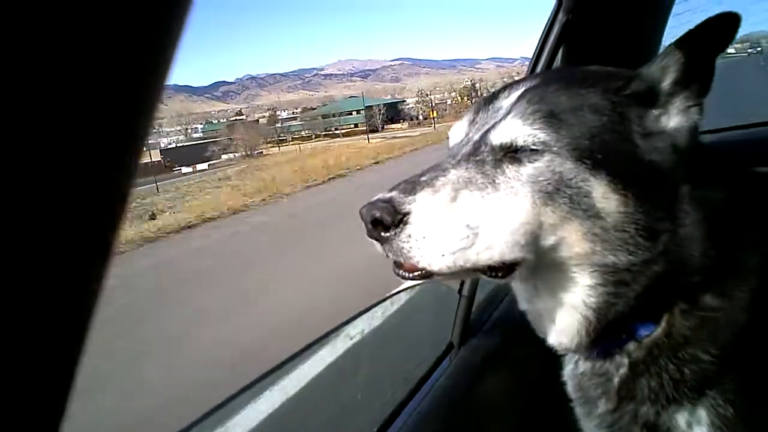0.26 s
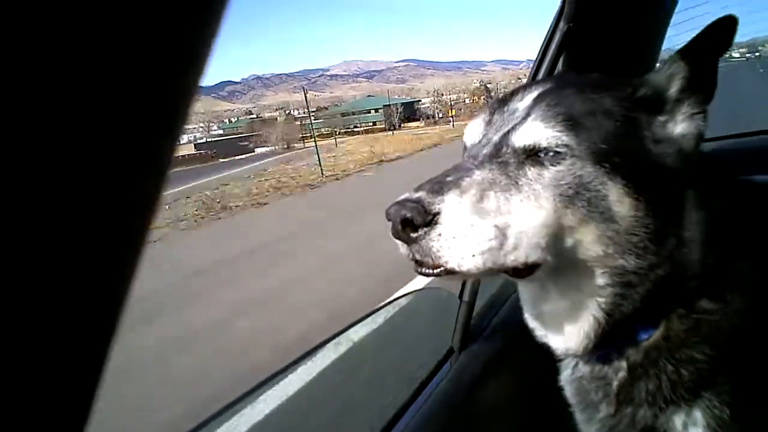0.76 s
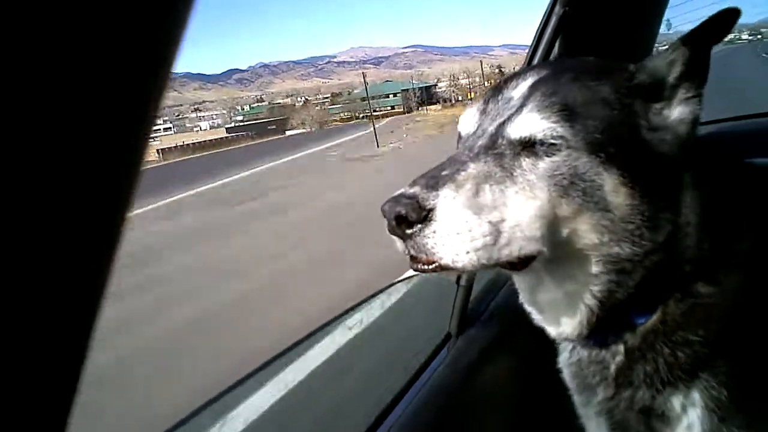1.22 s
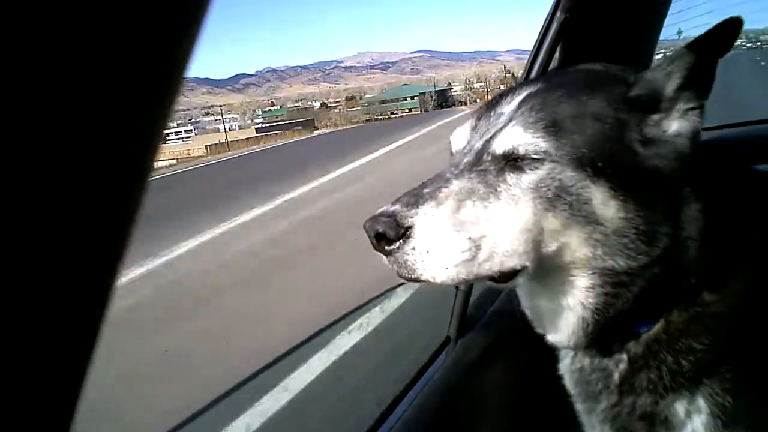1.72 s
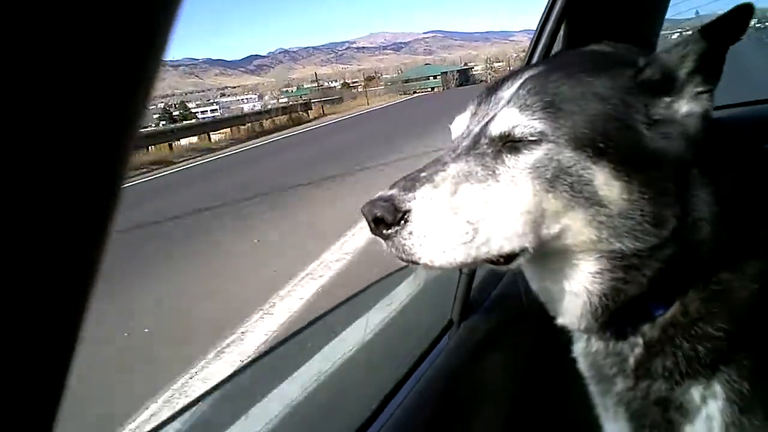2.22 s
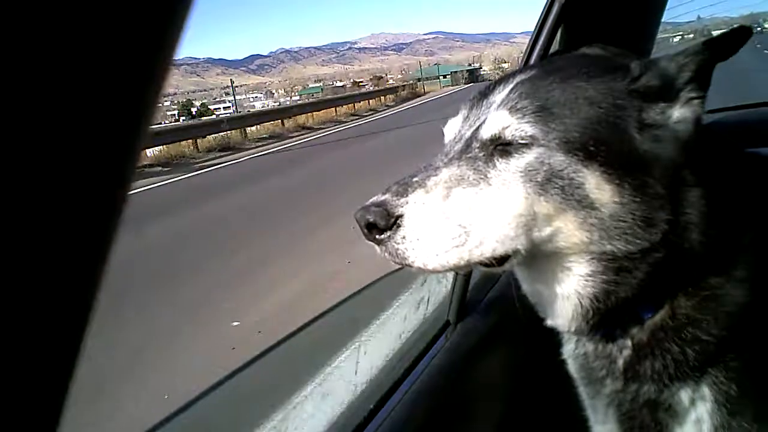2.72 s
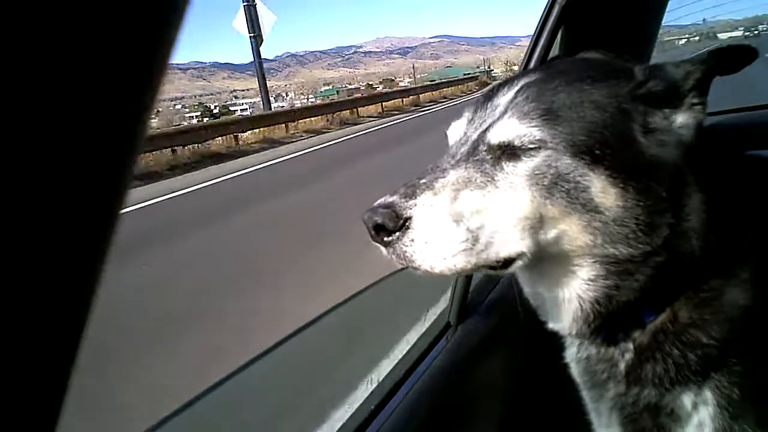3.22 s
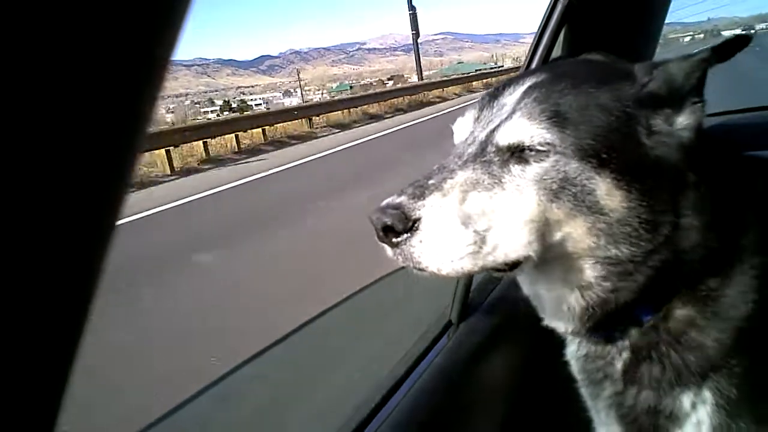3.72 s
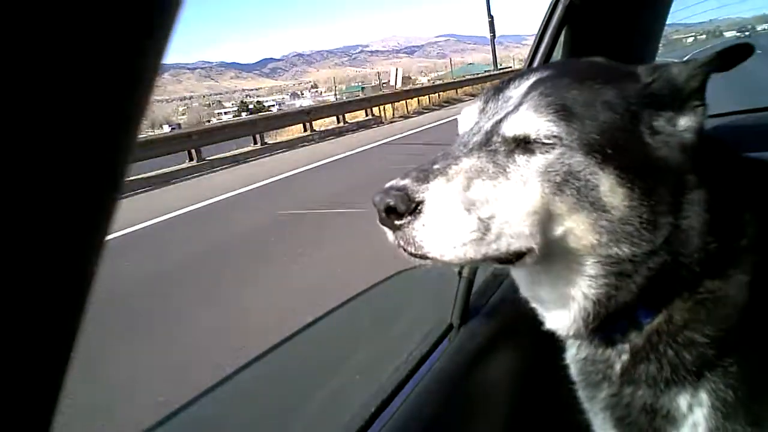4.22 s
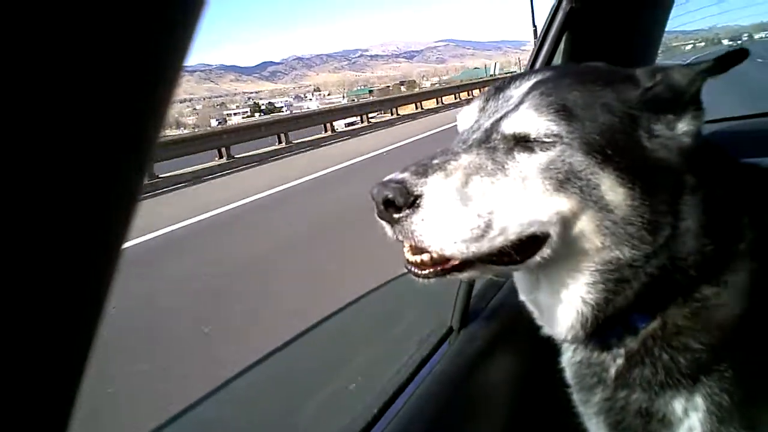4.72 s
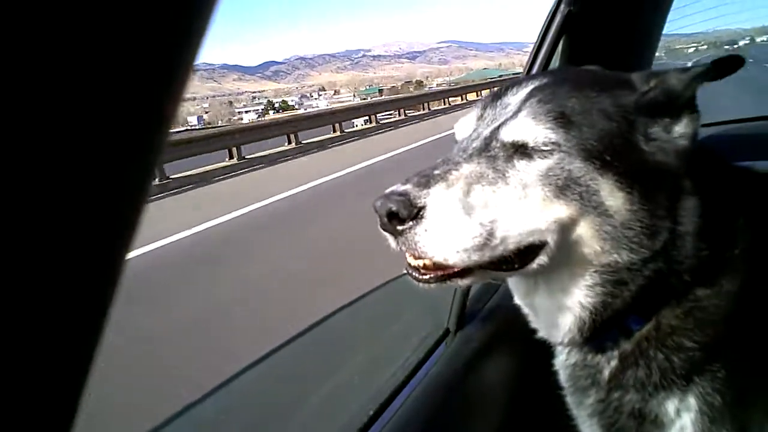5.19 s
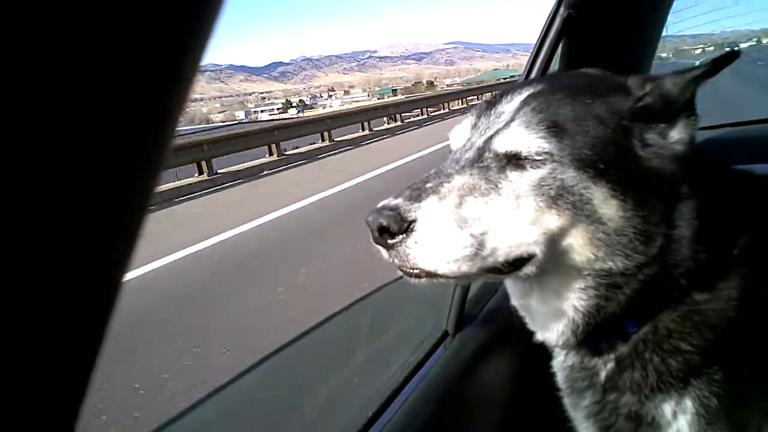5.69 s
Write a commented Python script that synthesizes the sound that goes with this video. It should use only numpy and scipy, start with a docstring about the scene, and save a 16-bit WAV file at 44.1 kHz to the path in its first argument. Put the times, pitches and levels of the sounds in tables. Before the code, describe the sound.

Inside a car at highway speed, close to an open side window, one small microphone catches continuous wind and road noise. A steady, muffled tyre and asphalt drone with boxy cabin resonance lies beneath. Over it the slipstream rushes in uneven lumps, with low buffeting, a rougher mid-range tearing at the window edge and sputtering hiss. Wind is fullest and hissiest in the first second, with a hard thump at about 0.8 s and a softer one at 1.3. It weakens from 1.5 s, broken by brief gusts around 1.7 to 2.2. A strong short gust and thump come near 3.0 s, then a thinner stretch with a lull at 3.8 and tiny ticks between 3.2 and 4.0. Gusts crowd together from 4.3 to 4.9, with low bumps around 4.8, then ease and swell slightly towards the end. Millisecond dropouts roughen it near 2.1, 2.9, 3.7, 4.7 and 5.4. The dog makes no sound.

```python
"""Open car window at highway speed

Inside the car beside an open side window, close to one small microphone: noise shaped by spectra gives
a steady road drone and a slipstream that rushes, flutters and hisses at the frame, with gusts and lulls.
Eddies thump on the microphone as short pressure swings; sharp single spikes with a faint, quickly fading
noisy tail make a few tiny ticks. At set moments the microphone chokes for a few milliseconds."""
import sys
import numpy as np
from scipy import signal
from scipy.fft import rfft, irfft, next_fast_len
from scipy.io import wavfile
from scipy.ndimage import uniform_filter1d, map_coordinates

SR = 44100
rng = np.random.default_rng(int(sys.argv[2]) if len(sys.argv) > 2 else 0)


def master_out(mix):
    """Clip the mix to full scale and print it as 16-bit PCM to the path in sys.argv[1]."""
    frames = np.transpose(np.atleast_2d(mix))
    ceiling = np.clip(frames, -1, 1)
    pcm = np.round(ceiling * 32767).astype(np.int16)
    wavfile.write(sys.argv[1], SR, pcm)


N = 262395

# broad resonances of the cabin air: (centre [Hz], width [Hz], height [dB])
CABIN_RESONANCES = [(196, 40, 3), (265.6, 32, 4), (356, 33, 3), (873, 155, 2)]
# spectrum of the hiss at the window, with or without the port's colour: (frequency [Hz], relative level [dB])
HISS_SPECTRUM = [(700, -20), (1800, -5), (2700, 2.5), (3500, 1), (5000, -5), (7000, -9), (9500, -15.5),
                 (11500, -25), (13000, -28.5), (15500, -30)]


def amp(db):
    """Decibels to gain."""
    return 10 ** (np.asarray(db) / 20)


def unit(x):
    """Scale to rms 1."""
    return x / np.sqrt(np.mean(x ** 2) + 1e-20)


def wobble(rate):
    """A smooth random curve, rate knots a second."""
    knots = rng.standard_normal(int(N * rate / SR) + 4)
    return map_coordinates(knots, [np.arange(N) * rate / SR])


def filtered(x, response):
    """x times a response of frequency, padded so that its end does not wrap round to the start."""
    m = next_fast_len(N + SR // 2)
    return irfft(rfft(x, m) * response(np.fft.rfftfreq(m, 1 / SR)), m)[:N]


def coloured(x, spectrum, bumps=()):
    """x through a smooth spectrum with bell-shaped peaks and dips, at rms 1."""
    f, level = np.transpose(spectrum)

    def response(hz):
        db = np.interp(np.log(hz + 1), np.log(f), level)
        for centre, width, height in bumps:
            db = db + height / (1 + (2 * (hz - centre) / width) ** 2)
        return amp(db)

    return unit(filtered(x, response))


def turbulence(patchy_db):
    """White noise whose strength drifts in patches of time and frequency, patchy_db rms."""
    z = signal.stft(rng.standard_normal(N), nperseg=512)[2]
    field = uniform_filter1d(rng.standard_normal(z.shape), size=9, axis=0)
    field = uniform_filter1d(field, size=10, axis=1)
    return signal.istft(z * amp(patchy_db * unit(field)), nperseg=512)[1][:N]


def road():
    """Steady cabin boom and the roar of tread on asphalt, coloured by the cabin air."""
    # spectrum of tyres and road heard inside: (frequency [Hz], relative level [dB])
    road_spectrum = [(20, -37), (50, -21), (90, -12.5), (200, -3.5), (280, -1.5), (450, -4), (680, -8.5),
                     (860, -6.5), (1250, -16.5), (1700, -11), (2600, -30), (6000, -39), (15000, -51.5)]
    return amp(-49) * coloured(turbulence(patchy_db=-1.0), road_spectrum, CABIN_RESONANCES)


def slipstream():
    """One wind strength drives the layers; the shear layer flaps in the opening, so they flutter together."""
    # steady strength of the stream between gusts: (time [s], level [dB])
    stream_levels = [(0.0, -39), (0.69, -41.5), (1.05, -41), (1.11, -44.5), (1.29, -43), (1.56, -47),
                     (1.79, -42), (2.51, -48.5), (2.8, -45), (3.36, -50.5), (4.22, -49), (4.98, -46.2),
                     (5.61, -47.5), (5.95, -43.5)]
    times, levels = np.transpose(stream_levels)
    stream_db = np.interp(np.arange(N) / SR, times, levels)
    mean_db = stream_db.mean()
    swell_db = stream_db - mean_db
    rise_db, bright_db = gusts()
    wind_db = swell_db + rise_db + 0.5 * wobble(21.9)
    flutter = 0.37 * wobble(45) + 0.43 * wobble(120) + 0.93 * wobble(300)
    # each layer: level against the stream [dB] + dB gained per dB of wind
    wind = amp(-10.5 + 0.75 * wind_db) * buffet(flutter)
    wind += amp(0.77 + 0.9 * wind_db) * rush(flutter)
    wind += amp(-8 + 0.79 * wind_db) * edge(flutter)
    wind += amp(-14.5 + 0.84 * wind_db + bright_db) * hiss(flutter, wind_db)
    # the broad hiss follows the steady stream, not the gusts
    wind += amp(-24.5 + 1.87 * swell_db) * broad_hiss(flutter)
    return amp(mean_db) * wind


def gusts(build_s=0.054, collapse_s=0.031):
    """Wind rise and extra hiss in dB: each gust through the window builds, holds and collapses."""
    # gusts, where a negative rise is a lull: (start [s], length [s], rise [dB], extra hiss [dB])
    gust_rows = [(-0.001, 0.29, 1.8, -0.4), (0.396, 0.21, 3.5, -0.8), (0.751, 0.048, 8, -2.1),
                 (0.895, 0.075, 4.5, 2), (1.456, 0.086, 6, -4), (1.719, 0.17, 5, -1.3),
                 (1.939, 0.14, 6.2, -1), (2.184, 0.052, 4.5, -1), (2.631, 0.044, 5.5, -1.1),
                 (2.844, 0.048, 6.5, -2), (2.94, 0.064, 10, -3.1), (3.098, 0.123, 6.5, -1.3),
                 (3.479, 0.099, 6, 1), (3.732, 0.046, 6, -0.6), (3.829, 0.056, -4, -6),
                 (3.907, 0.078, 3, 1.2), (4.29, 0.094, 5, 1.5), (4.437, 0.1, 6.5, 1.8), (4.619, 0.11, 7, 0),
                 (4.742, 0.11, 9.5, -1.3), (5.22, 0.11, 4, -0.5), (5.375, 0.098, 5.5, 0.5),
                 (5.816, 0.12, 3.5, -2)]
    t = np.arange(N) / SR
    rise_db, bright_db = np.zeros(N), np.zeros(N)
    for start, length, db, hiss_db in gust_rows:
        building = (t - start) / build_s
        collapsing = (start + length - t) / collapse_s
        # both ramps are half way at the gust's start and end
        shape = np.clip(0.5 + np.minimum(building, collapsing), 0, 1)
        rise_db += db * shape
        bright_db += hiss_db * shape
    return rise_db, bright_db


def buffet(flutter):
    """Low, heavy air noise that swells strongly with the flapping shear layer."""
    # spectrum of the buffeting: (frequency [Hz], relative level [dB])
    buffet_spectrum = [(15, -36), (30, -20), (60, -9), (110, -2.5), (170, -2), (260, -5), (600, -31),
                       (2000, -64)]
    swelling = amp(2.8 * flutter + 1.0 * wobble(13))
    return coloured(turbulence(patchy_db=2.0) * swelling, buffet_spectrum)


def rush(flutter):
    """Small eddies make the rushing air arrive in lumps, coloured by the cabin air."""
    # spectrum of the rush: (frequency [Hz], relative level [dB])
    rush_spectrum = [(60, -39), (140, -8.5), (230, -4), (340, -2), (460, -3.5), (660, -5.5), (850, -6.5),
                     (1250, -20), (1900, -21.5), (2700, -57), (5000, -69)]
    lumps = amp(1.2 * flutter + 1.46 * wobble(600))
    return coloured(turbulence(patchy_db=0.95) * lumps, rush_spectrum, CABIN_RESONANCES)


def edge(flutter):
    """Air shearing off the frame's edge, between rush and hiss."""
    # spectrum at the frame's edge: (frequency [Hz], relative level [dB])
    edge_spectrum = [(400, -31), (800, -4.5), (1050, 3.5), (1280, 0.5), (1600, -1.5), (2100, -5.5),
                     (2700, -13.5), (4000, -22), (9000, -50)]
    return coloured(turbulence(patchy_db=0.7) * amp(1.56 * flutter), edge_spectrum)


def hiss(flutter, wind_db):
    """Hiss through the microphone port: a weak stream sputters, a strong one hisses more evenly."""
    # the hollow of the microphone port colours the hiss: (centre [Hz], width [Hz], height [dB])
    port_resonances = [(2660, 470, -8), (3600, 700, 0), (4230, 290, -5.5), (5900, 880, -3), (7120, 770, 2)]
    unevenness = np.interp(wind_db, [-4, 7], [2.0, 1.0])
    sputter = unevenness * (wobble(110) + 1.07 * wobble(500) + 0.36 * wobble(14))
    air = turbulence(patchy_db=0.73) * amp(0.36 * flutter + sputter)
    return coloured(air, HISS_SPECTRUM, port_resonances)


def broad_hiss(flutter):
    """The broad hiss of a strong stream, clear of the port's colour."""
    return coloured(turbulence(patchy_db=0.0) * amp(1.1 * flutter), HISS_SPECTRUM)


def thumps(count=3):
    """Each eddy sweeps over the port as one big swing amid a few smaller whirls."""
    # eddies that hit the microphone: (time [s], level [dB], pitch [Hz])
    eddies = [(0.7732, -17, 633), (1.288, -25, 433), (2.9856, -20.5, 418), (3.1038, -30, 760),
              (4.7726, -25, 300), (4.8019, -27.5, 180), (4.825, -26, 313)]
    whirl_db, whirl_octaves = -9.5, 0.6  # level against the eddy, scatter of pitch either way
    ahead_s, behind_s = 0.009, 0.00615  # how far before and after the eddy whirls may arrive
    out = np.zeros(N)
    for s, db, hz in eddies:
        out += amp(db) * swing(s, hz)
        for when, size in rng.random((count, 2)):
            delay = when * (ahead_s + behind_s) - ahead_s
            whirl_hz = hz * 2 ** (whirl_octaves * (2 * size - 1))
            out += amp(db + whirl_db) * swing(s + delay, whirl_hz)
    return out


def swing(s, hz, width=0.61):
    """One swing of suction and pressure centred on time s; width is in cycles."""
    cycles = (np.arange(N) / SR - s) * hz
    near = np.abs(cycles) < 4
    out = np.zeros(N)
    out[near] = np.sin(2 * np.pi * cycles[near]) * np.exp(-(cycles[near] / width) ** 2)
    return out


def choke(depth=0.97):
    """Share of the sound that gets through: it nearly cuts out while a pressure swing pins the diaphragm."""
    # moments when the microphone chokes: (centre [s], length [s])
    choke_moments = [(2.081, 0.0049), (2.0958, 0.0063), (2.8824, 0.0073), (2.993, .0032), (3.7243, 0.006),
                     (4.692, 0.005), (4.7116, 0.006), (5.429, 0.0081)]
    gain, t = np.ones(N), np.arange(N) / SR
    for s, length in choke_moments:
        reach = np.minimum(np.abs(t - s) / (length / 2), 2)
        gain *= 1 - depth * np.exp(-reach ** 6)
    return gain


def ticks(life_s=0.00041, tail=0.1):
    """Tiny bright snaps in the wind: one sharp spike with a faint noisy tail that fades in about a millisecond."""
    # sharp ticks: (time [s], level [dB])
    tick_rows = [(3.2071, -42), (3.7618, -43), (3.8957, -41), (3.9394, -31), (3.9914, -42), (4.7704, -39)]
    out, t = np.zeros(N), np.arange(SR // 200) / SR
    for s, db in tick_rows:
        snap = tail * rng.standard_normal(len(t)) * np.exp(-t / life_s)
        snap[0] = 1
        out[round(s * SR):][:len(t)] += amp(db) * snap
    # soften above 4500 Hz
    return filtered(out, lambda hz: 2 / (1 + 1j * hz / 4500))


def scene():
    """Road, wind and its blows at the microphone."""
    return (road() + slipstream() + thumps() + ticks())[None]


def record(dry):
    """The microphone chokes now and then; nothing is kept above the band limit."""
    top_hz = 15720
    return filtered(dry[0] * choke(), lambda hz: hz < top_hz)[None]


dry = scene()
out = record(dry)
master_out(out)
```